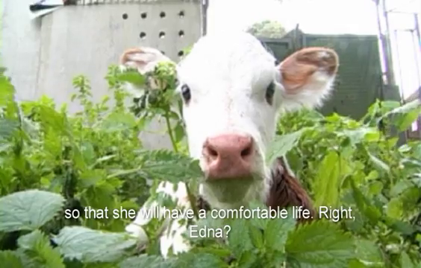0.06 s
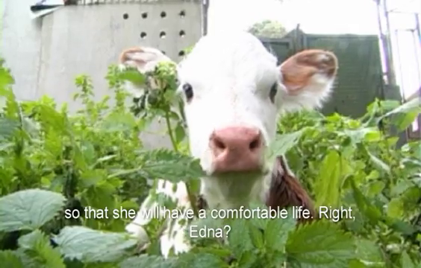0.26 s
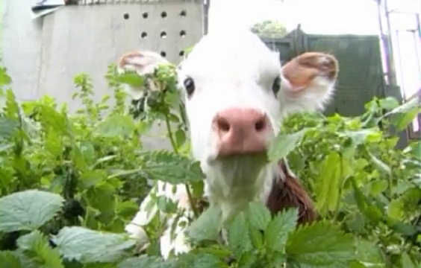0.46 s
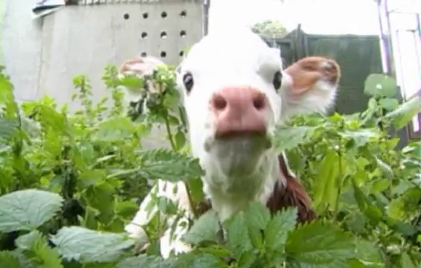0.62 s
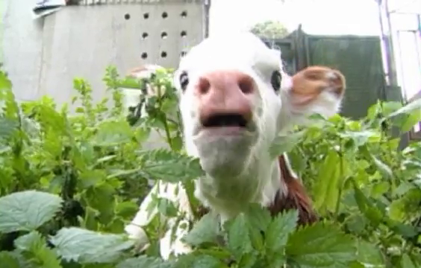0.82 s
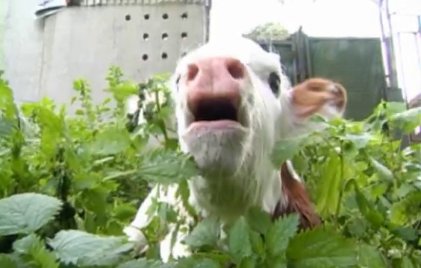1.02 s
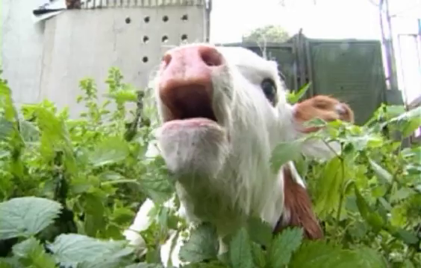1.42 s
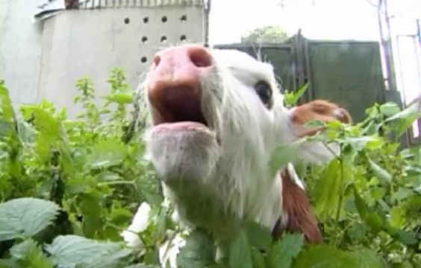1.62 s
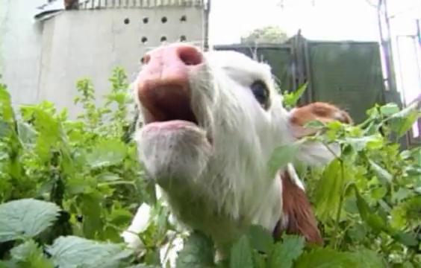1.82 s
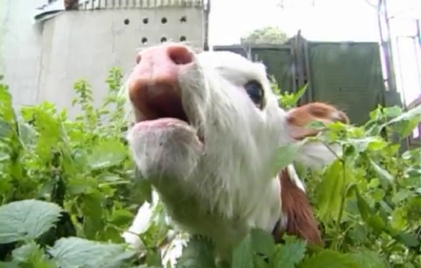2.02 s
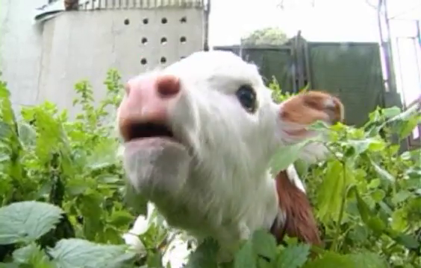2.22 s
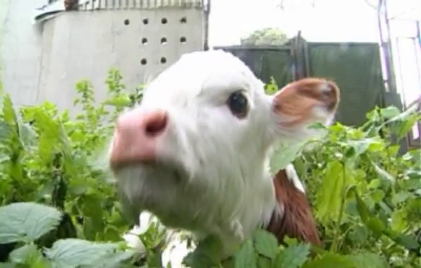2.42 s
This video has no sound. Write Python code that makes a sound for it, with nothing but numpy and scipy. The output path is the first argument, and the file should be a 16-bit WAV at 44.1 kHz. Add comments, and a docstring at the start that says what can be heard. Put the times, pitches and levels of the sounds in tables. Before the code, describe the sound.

A calf moos once, close to the microphone, starting as a creaky nasal hum and opening into a long, steady bawl that sags at the end. A small bird then chirps faintly over a distant outdoor rumble.

```python
"""A calf moos in a garden

Over a distant rumble, a close calf gives one long moo as its vocal folds snap shut again and again.
A creaky hum through the nose opens into a clear, steady bawl, and the pitch sags at the end.
Then a small bird chirps. A short yard echo follows the sound. The right channel is the stronger,
and an automatic volume control pushes everything down, background too, while the moo is loud."""
import sys
import numpy as np
from scipy import signal
from scipy.fft import rfft, irfft
from scipy.io import wavfile
from scipy.ndimage import uniform_filter1d, map_coordinates

SR = 44100
rng = np.random.default_rng(int(sys.argv[2]) if len(sys.argv) > 2 else 0)


def generate_wav(signal):
    """Clip the signal to [-1, 1] and save it as 16-bit WAV at the path in sys.argv[1]."""
    frames = np.transpose(np.atleast_2d(signal))
    scaled = np.clip(frames, -1, 1) * 32767
    pcm = np.round(scaled).astype(np.int16)
    wavfile.write(sys.argv[1], SR, pcm)


N = 112454
TIME = np.arange(N) / SR

# Tone of the distant rumble. Each row: frequency in Hz, relative level in dB.
RUMBLE = [(20, -7.5), (35, -17), (70, -1.5), (100, -13.5), (170, -7), (260, -5), (340, -12.5), (600, -19.5),
          (1000, -21), (1700, -26), (3000, -38.5), (5000, -48), (8000, -50.5), (15500, -55)]
# Hums and faint tones. Each row: pitch in Hz, waver in Hz, level in dB before the moo, and after it.
HUMS = [(68.2, 6.9, -40, -46), (118.2, 3.53, -41.5, -37), (1690, 14, -61, -53), (2420, 13, -79, -62.5)]

# How fast the vocal folds beat. Each row: time in seconds, pitch in Hz.
PITCH = [(.1935, 82.9), (.215, 100), (.25, 118.9), (.29, 135.9), (.35, 145.5), (.43, 154.5), (.5, 157.7),
         (.546, 158.8), (.65, 161.1), (.738, 161.9), (.914, 162.1), (1.1, 160.9), (1.36, 159.5),
         (1.68, 155.3), (1.818, 151.5), (1.88, 147.6), (1.915, 138.8), (1.96, 101.6)]
# How hard the calf calls. Each row: time in seconds, relative level in dB.
EFFORT = [(.19, -36.5), (.25, -29.5), (.33, -26.5), (.435, -24.5), (.48, -29.5), (.53, -19.5), (.586, -16),
          (.7, -12.5), (.87, -4.5), (1.0, -2), (1.3, -4), (1.67, -8.5), (1.864, -14.5), (1.914, -10),
          (1.936, -18.5), (1.954, -22.5), (1.966, -32)]
# Roughness of the folds. Each row: time in seconds, boost in dB to air noise and uneven beats.
ROUGHNESS = [(.2, 17), (.45, 6), (.58, 9.5), (.7, -2), (1.1, -2.5), (1.35, 0), (1.6, 2.5), (1.8, 0),
             (1.95, 11)]
# Air noise next to the click of the folds. Each row: frequency in Hz, relative level in dB.
RASP = [(200, -41.5), (1500, -27.5), (2400, -29), (4000, -23.5), (7000, -16.5), (12000, -25)]
# Tone of the folds closing, and of sound leaving the lips. Each row: frequency in Hz, gain in dB.
CLOSURE_TONE = [(100, 1.5), (4050, -0.5), (4300, -10), (6500, -5), (6950, -16), (12000, -21.5),
                (16000, -24)]
LIPS_TONE = [(160, -7), (320, -0.5), (480, 1), (800, 2), (1000, -3), (2200, 0.5), (3000, -1), (16000, 0)]
# Resonances (pitches that ring) of the nose as the head stretches forward. Each row: frequency in Hz
# at first and stretched, width in Hz, relative level in dB at first and stretched.
NOSE_RESONANCES = [(150, 140, 140, -29.5, -28), (440, 530, 190, -32.5, -30.5), (700, 740, 123, -31.5, -27),
                   (1070, 1050, 250, -37.5, -36), (1310, 1270, 75, -38.5, -33),
                   (2120, 1910, 120, -32.5, -25), (2430, 2540, 380, -37, -41.5),
                   (3300, 3280, 210, -42, -37), (4060, 3710, 280, -34, -31), (4950, 4520, 350, -46, -42),
                   (5700, 5800, 430, -42, -34), (6140, 5700, 480, -39.5, -48), (7930, 7960, 230, -30, -41),
                   (8850, 8600, 390, -46, -39), (10360, 9750, 330, -39, -32.5),
                   (11260, 11000, 1400, -39, -39)]
# The nose once the lips part. Each row: frequency in Hz, width in Hz, relative level in dB.
PARTED_RESONANCES = [(168, 94, -25), (470, 160, -45), (780, 340, -31), (1220, 520, -38), (1830, 170, -42),
                     (2300, 430, -49), (4100, 170, -35), (4700, 620, -42), (5800, 390, -35),
                     (6200, 280, -45), (9200, 350, -47), (10000, 610, -38), (11300, 1700, -37)]
# Where the sound comes out. Each row: time in seconds, blend from 0 (nose) to 1 (mouth).
MOUTH_SHARE = [(.445, 0.19), (.456, 0.36), (.49, 0.63), (.53, 0.68), (.6, 0.91), (.72, 0.99), (.9, 1)]
# How far the mouth opens. Each row: time in seconds, opening from 0 (ajar) to 1 (wide).
GAPE = [(.5, 0.054), (.6, 0.045), (.8, 0.32), (1.0, 0.49), (1.25, 0.51), (1.55, 0.58), (1.8, 0.95),
        (1.92, 0.89)]
# The six lower mouth resonances (formants), which follow jaw and tongue.
# Each row: time in seconds, frequency in Hz, width in Hz, relative level in dB.
FORMANT_1 = [(.5, 470, 119, -23), (.65, 460, 94, -17), (.82, 476, 82, -17.5), (1.0, 501, 145, -22.5),
             (1.25, 540, 196, -22.5), (1.6, 550, 189, -21.5), (1.84, 550, 179, -23.5),
             (1.91, 557.5, 85.5, -14), (1.96, 545.3, 85, -12)]
FORMANT_2 = [(.55, 1336, 166, -26), (.8, 1418, 130, -24.5), (1.0, 1405, 98, -17.5), (1.25, 1427, 91, -19.5),
             (1.55, 1430, 86, -18.5), (1.8, 1422, 132, -23.5), (1.92, 1340, 195, -27)]
FORMANT_3 = [(.47, 1700, 300, -22.5), (.52, 1850, 166, -18), (.6, 1910, 114, -21), (.75, 1896, 116, -23.5),
             (1.0, 1925, 128.5, -29), (1.35, 1940, 200, -28), (1.6, 1996, 140, -25), (1.8, 1960, 141, -26),
             (1.95, 1946, 204, -25.5)]
FORMANT_4 = [(0.501, 2420, 255, -31), (.55, 2600, 130, -26), (.62, 2580, 86.6, -23.5),
             (.75, 2607, 81.4, -24), (1.0, 2616, 87, -22), (1.35, 2618, 105, -19.5), (1.6, 2590, 108, -20),
             (1.801, 2620, 152, -25.5), (1.95, 2700, 220, -26.5)]
FORMANT_5 = [(.485, 2870, 130, -44.5), (.505, 3060, 120, -23), (.535, 3100, 118, -25),
             (.6, 3290, 184, -30.5), (.75, 3275, 138, -28.5), (1.0, 3260, 175, -26), (1.35, 3230, 256, -29),
             (1.599, 3230, 227, -30.5), (1.8, 3270, 240, -27.5), (1.95, 3390, 199, -25)]
FORMANT_6 = [(.44, 3520, 100, -25), (.453, 3470, 100, -21), (.497, 3480, 111, -27), (.522, 3610, 150, -29),
             (.555, 3810, 237, -27), (.7, 3930, 300, -34.5), (1.002, 3940, 260, -35.5),
             (1.35, 3858, 282.9, -30.5), (1.899, 3920, 278, -31.5)]
# Upper mouth resonances. Each row: frequency in Hz ajar and wide open, width in Hz,
# relative level in dB ajar and wide open.
UPPER_RESONANCES = [(4660, 4790, 135, -31.5, -46.5), (5170, 5230, 290, -45, -42),
                    (5620, 5794, 255, -34, -31.5), (6160, 6080, 170, -30.5, -43),
                    (6800, 6550, 190, -46, -42), (7270, 8230, 210, -42.5, -50.5),
                    (8440, 8750, 205, -31.5, -40.5), (9560, 9070, 600, -52, -36.5),
                    (10900, 11000, 1500, -42.5, -74), (12800, 12500, 2140, -67, -49)]

# The moo on the left, next to the right. Each row: frequency in Hz, gain in dB.
LEFT_TONE = [(60, -22), (150, -9), (350, -13.5), (650, -7.5), (1030, -7), (1250, -7.5), (1600, -1.5),
             (1850, -7.5), (2200, 1), (2600, -7.5), (3300, -7), (4000, -10.5), (4350, 3), (4750, 5),
             (5400, -3.5), (6500, -4), (9000, -4), (12000, 1)]
# How far its waves are shifted on the left. Each row: frequency in Hz, phase in radians.
LEFT_PHASE = [(0, -2.5), (300, -2.5), (450, -1.16), (700, -1.4), (1000, -0.5), (1250, 1.51), (1650, 1.98),
              (2000, 3.5), (2400, 4), (2900, 4.5), (3400, 7), (3950, 10), (4300, 10.5), (4800, 10.5),
              (5600, 13), (6500, 15), (7400, 19.5), (8400, 21), (9200, 17), (10000, 33), (15800, 40.5)]
# Extra delay on the left as the head turns. Each row: time in seconds, delay in seconds.
LEFT_LAG = [(.3, -.00003), (.75, -.000003), (1.2, .000006), (1.7, .000026)]

# Bird notes. Each row: start and length in seconds, first, middle and last pitch in Hz,
# level in dB, size of the warble in Hz.
CHIRPS = [(2.082, .03, 6060, 6260, 6960, -50, 454), (2.095, 0.062, 4400, 4850, 4620, -51, 110),
          (2.104, 0.055, 3860, 3600, 4200, -50.5, 496), (2.179, .066, 4320, 3650, 3320, -47, 89.5),
          (2.43, 0.049, 4770, 4440, 4200, -56.5, 210), (2.506, 0.044, 3870, 4570, 4400, -54, 117)]

MOO_START_S, LIPS_PART_S, MOO_END_S = PITCH[0][0], .449, 1.968
PULSE_SIZE, MAX_BEATS = 2048, 400   # samples for one beat of the folds to ring out; most beats in a moo


def from_db(db):
    """Turn decibels into a multiplier."""
    return 10 ** (np.asarray(db) / 20)


def at(rows, where):
    """Read each column of a table, drawing straight lines between rows."""
    first, *columns = np.transpose(rows)
    return [np.interp(where, first, column) for column in columns]


def gain_at(points, hz):
    """Read a tone table as multipliers, on a log-frequency scale."""
    f, db = np.transpose(points)
    return from_db(np.interp(np.log(hz + 1), np.log(f), db))


def shaped_noise(gain):
    """Noise with one gain per frequency, scaled to a typical size (rms) of 1."""
    x = irfft(rfft(rng.standard_normal(N)) * gain, N)
    return x / np.sqrt(np.mean(x ** 2) + 1e-20)


def noise(tone):
    """Noise coloured by a tone table."""
    return shaped_noise(gain_at(tone, np.fft.rfftfreq(N, 1 / SR)))


def drift(rate_hz):
    """A smooth random wobble, mostly slower than rate_hz."""
    return shaped_noise(1 / (1 + (np.fft.rfftfreq(N, 1 / SR) / rate_hz) ** 2) ** 2)


def background(rumble_db=-33, rumble_after_db=-35, whine_hz=15623):
    """Distant rumble and wavering hums, mostly on the right, with soft hiss and a camera's thin whine."""
    fade_s = [.5, 2]   # the levels slide during the moo
    flutter_db = 0.76 * drift(33)
    right = from_db(np.interp(TIME, fade_s, [rumble_db, rumble_after_db]) + flutter_db) * noise(RUMBLE)
    for hz, waver_hz, db_before, db_after in HUMS:
        level = from_db(np.interp(TIME, fade_s, [db_before, db_after]) + 3.4 * drift(12))
        right += level * np.sin(2 * np.pi * np.cumsum(hz + waver_hz * drift(15.7)) / SR)
    left = from_db(-30) * (0.42 * right + 0.82 * from_db(rumble_db) * noise(RUMBLE))
    hiss_tone = [(100, 23), (2000, 2), (6000, -13), (16000, -19)]
    hiss = from_db(-52.5) * np.array([noise(hiss_tone), noise(hiss_tone)])
    whine = from_db(-73) * np.sin(2 * np.pi * whine_hz * TIME)
    return np.array([left, right]) + hiss + whine


def resonance(f, hz, width, db, steepness=1.366):
    """The power one resonance passes: most at hz, less to either side."""
    return from_db(db) ** 2 / (1 + (2 * (f - hz) / width) ** 2) ** steepness


def gliding(f, rows, blend):
    """The power passed by resonances sliding from one shape (blend 0) to another (blend 1)."""
    return sum(resonance(f, hz0 + blend * (hz1 - hz0), width, db0 + blend * (db1 - db0))
               for hz0, hz1, width, db0, db1 in rows)


def throat(times, f):
    """Nose and mouth colour each beat of the folds, keeping the overall energy the same."""
    stretch = np.clip((times - MOO_START_S) / (LIPS_PART_S - MOO_START_S), 0, 1)
    parted = sum(resonance(f, *row) for row in PARTED_RESONANCES)
    nose = np.where(times > LIPS_PART_S, parted, gliding(f, NOSE_RESONANCES, stretch))
    formants = FORMANT_1, FORMANT_2, FORMANT_3, FORMANT_4, FORMANT_5, FORMANT_6
    mouth = sum(resonance(f, *at(track, times)) for track in formants)
    tongue_wobble = 1 + 0.0037 * np.interp(times, TIME, drift(14))
    mouth += gliding(f * tongue_wobble, UPPER_RESONANCES, at(GAPE, times)[0])
    share = at(MOUTH_SHARE, times)[0]
    power = share ** 2 * mouth * gain_at(LIPS_TONE, f) ** 2 + (1 - share) * nose
    gain = np.sqrt(power) * gain_at(CLOSURE_TONE, f)
    return gain / np.sqrt(np.mean(gain ** 2, axis=1, keepdims=True))


def ring_after(gain):
    """Make a filter that rings only after it is struck (minimum phase)."""
    cepstrum = irfft(np.log(gain + 1e-9))
    cepstrum[:, 1:PULSE_SIZE // 2] *= 2
    cepstrum[:, PULSE_SIZE // 2 + 1:] = 0
    return np.exp(rfft(cepstrum))


def calf(waver_hz=.15, closing_s=0.00053):
    """Each time the vocal folds shut, a click and a puff of air set the throat ringing."""
    clock = MOO_START_S + TIME
    cycles = np.cumsum(at(PITCH, clock)[0] + waver_hz * drift(29)) / SR
    beats = np.arange(np.interp(MOO_END_S, clock, cycles))
    times = np.interp(beats, cycles, clock)[:, None]
    pitch, rough = at(PITCH, times)[0], from_db(at(ROUGHNESS, times)[0])
    chance = rng.standard_normal((MAX_BEATS, PULSE_SIZE))[:len(beats)]
    # Rough folds beat unevenly, in both timing and strength.
    onset = (times + 2e-6 * rough * chance[:, -1:]) * SR
    strength = from_db(at(EFFORT, times)[0] + 0.2178 * rough * chance[:, -2:-1]) * np.sqrt(SR / pitch)
    f = np.fft.rfftfreq(PULSE_SIZE, 1 / SR)
    click = -np.exp(-2j * np.pi * f * (onset % 1) / SR)   # placed between samples
    puff = chance * np.exp(-2 * pitch * np.arange(PULSE_SIZE) / SR) * 2 * np.sqrt(pitch / SR)
    source = click + rfft(puff) * rough * gain_at(RASP, f)
    pulses = irfft(strength * source * ring_after(throat(times, f)))
    moo = np.zeros(N + PULSE_SIZE)
    for start, pulse in zip(onset[:, 0].astype(int), pulses):
        moo[start:start + PULSE_SIZE] += pulse
    # The air flow falls off before the folds shut, so each pulse's low tones lead its snap.
    decay = np.exp(-1 / (closing_s * SR))
    return signal.lfilter([-decay, 1], [1, -decay], moo[::-1])[::-1][:N]


def microphones(moo):
    """The left microphone hears the calf mostly weaker, shifted in phase, and later as the head turns."""
    f = np.fft.rfftfreq(N, 1 / SR)
    left = irfft(rfft(moo) * gain_at(LEFT_TONE, f) * np.exp(1j * at(LEFT_PHASE, f)[0]), N)
    delayed_samples = (TIME - at(LEFT_LAG, TIME)[0]) * SR
    return np.array([map_coordinates(left, [delayed_samples], order=3), moo])


def scatter(x, samples, fade_s, delay_s, keep, cut_hz):
    """Many tiny echoes, different in each channel, that fall by 60 dB in fade_s."""
    t = TIME[:samples]
    echoes = rng.standard_normal((2, len(t))) * from_db(-60 * t / fade_s) * (t >= delay_s)
    echoes /= np.sqrt(np.sum(echoes ** 2, axis=1, keepdims=True))
    echoes = signal.sosfilt(signal.butter(2, cut_hz, keep, fs=SR, output="sos"), echoes)
    return signal.fftconvolve(x, echoes, axes=1)[:, :N]


def treble_smear(x):
    """Tiny echoes, different in each channel, soften and widen the treble of each pulse."""
    return from_db(-1) * scatter(x, SR // 25, fade_s=0.032, delay_s=0, keep="high", cut_hz=7700)


def faint_ring(x, hz=1696, fade_s=0.31):
    """Something near the calf rings along at one pitch and outlasts the moo."""
    decay = from_db(-60 / (fade_s * SR))
    feed = (1 - decay ** 2) / 2
    feedback = [1, -2 * decay * np.cos(2 * np.pi * hz / SR), decay ** 2]
    return from_db(-10) * signal.lfilter([feed, 0, -feed], feedback, x)


def yard(x, gain_db, cut_hz):
    """The wall and the plants send back a short, duller echo."""
    return from_db(gain_db) * scatter(x, SR // 2, fade_s=0.09, delay_s=0.014, keep="low", cut_hz=cut_hz)


def bird(left_db=-12.5):
    """A small bird whistles short, curving notes with a fast warble."""
    song = np.zeros(N)
    for start, length, first_hz, middle_hz, last_hz, db, warble_hz in CHIRPS:
        progress = np.clip((TIME - start) / length, 0, 1)
        curve = np.polyfit([0, .5, 1], [first_hz, middle_hz, last_hz], 2)
        hz = np.polyval(curve, progress) + warble_hz * drift(570)
        level = from_db(db + 4.0 * drift(120)) * np.sin(np.pi * progress)
        song += level * np.sin(2 * np.pi * np.cumsum(hz) / SR)
    return song * from_db([[left_db], [0]])


def scene():
    """Add up the background, the calf and the bird, with their echoes."""
    moo, chirps = microphones(calf()), bird()
    moo = moo + treble_smear(moo) + faint_ring(moo) + yard(moo, gain_db=-19.5, cut_hz=11000)
    chirps = chirps + yard(chirps, gain_db=-3, cut_hz=12000)
    return background() + moo + chirps


def volume_control(x, threshold_db=-20.5, slope=0.91, attack_s=0.069, release_s=0.057, step=64):
    """The volume sinks while the right channel is over the threshold, then recovers."""
    level_db = 10 * np.log10(uniform_filter1d(x[1] ** 2, size=512) + 1e-12)[::step]
    cut_db, cuts = 0, []
    for wanted_db in slope * np.maximum(level_db - threshold_db, 0):
        response_s = attack_s if wanted_db > cut_db else release_s
        cut_db += (wanted_db - cut_db) * step / SR / response_s
        cuts.append(cut_db)
    return x * from_db(-np.interp(TIME, TIME[::step], cuts))


def record(dry):
    """Apply the volume control, then cut the treble above 15900 Hz."""
    return signal.sosfilt(signal.ellip(12, .1, 80, 15900, fs=SR, output="sos"), volume_control(dry))


dry = scene()
out = record(dry)
generate_wav(out)
```